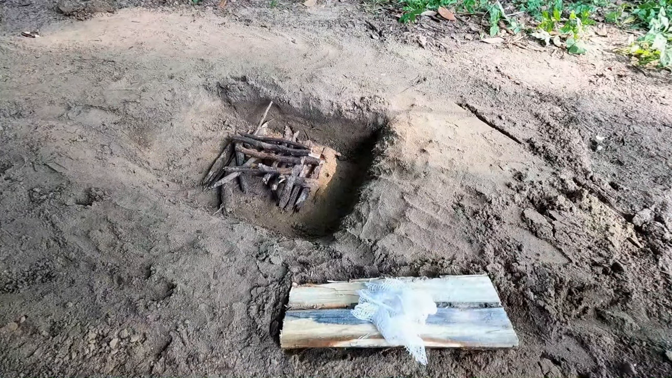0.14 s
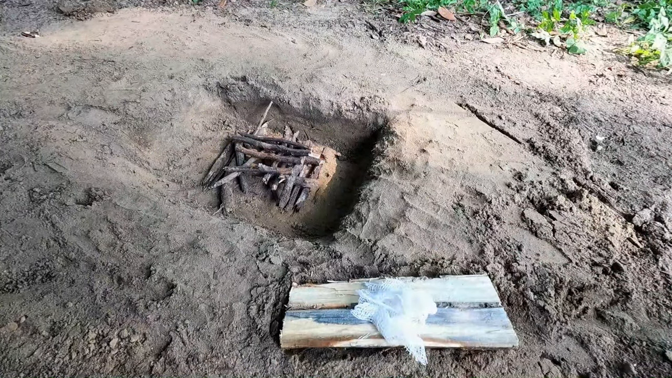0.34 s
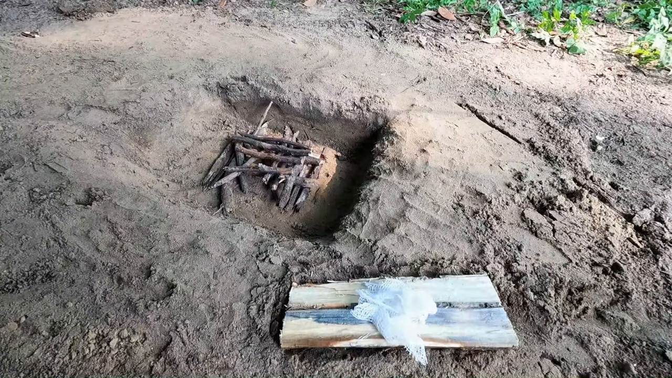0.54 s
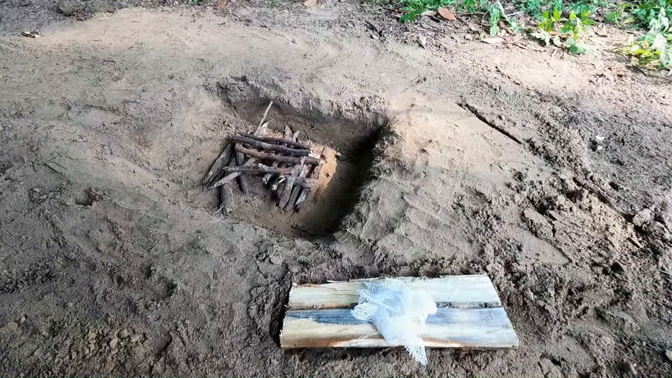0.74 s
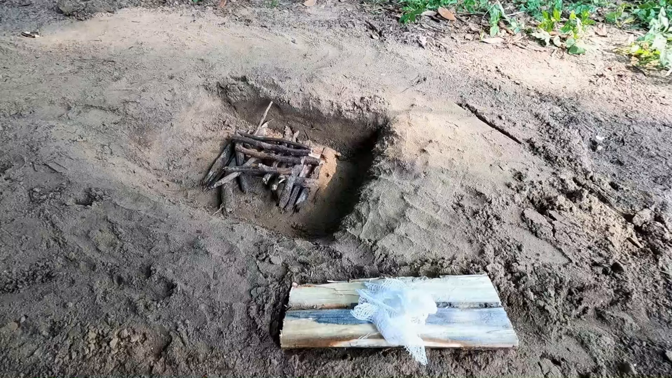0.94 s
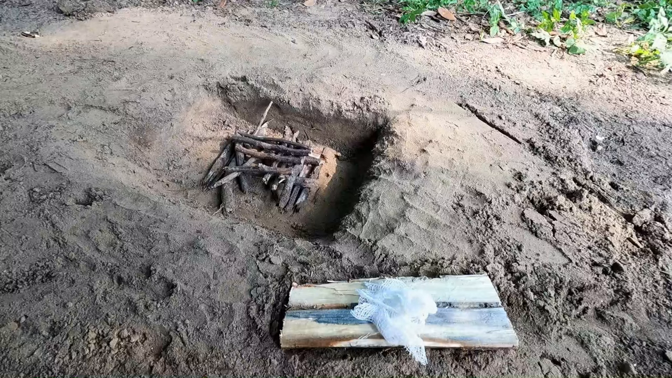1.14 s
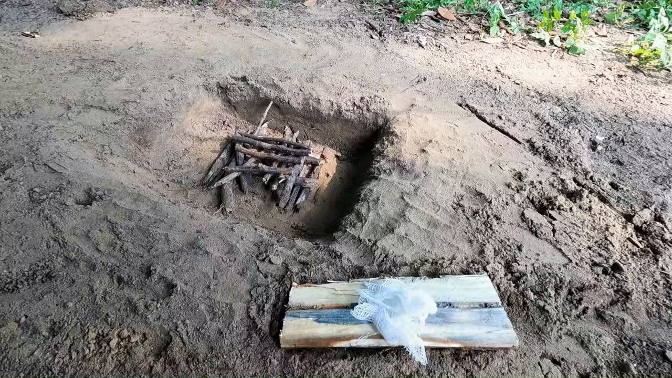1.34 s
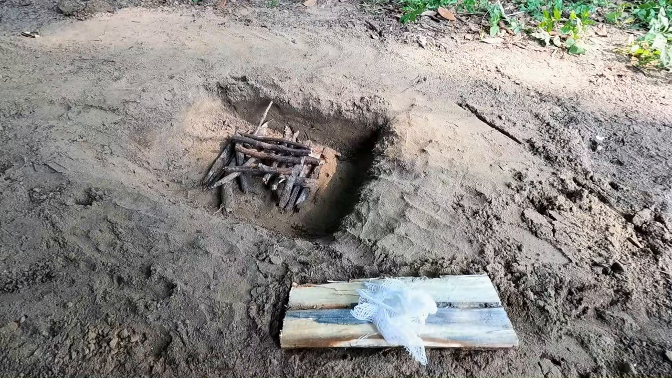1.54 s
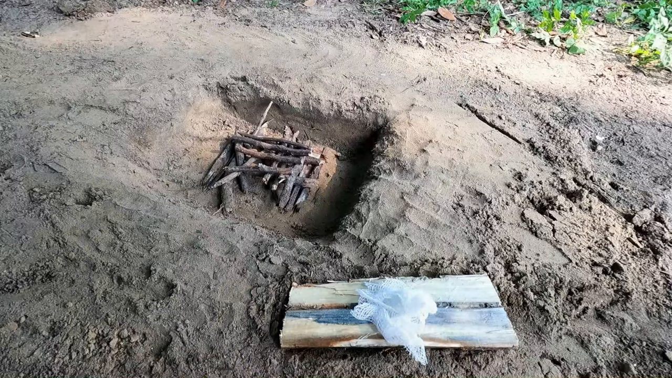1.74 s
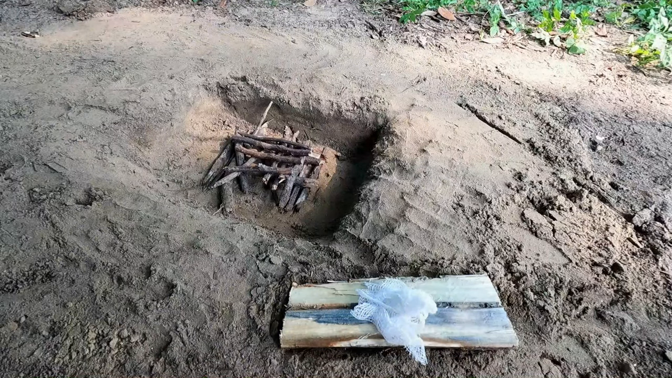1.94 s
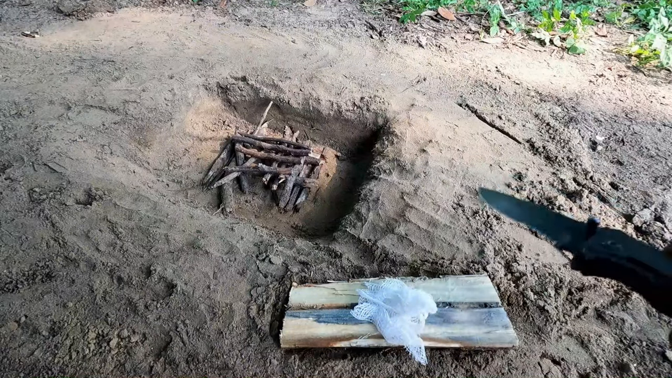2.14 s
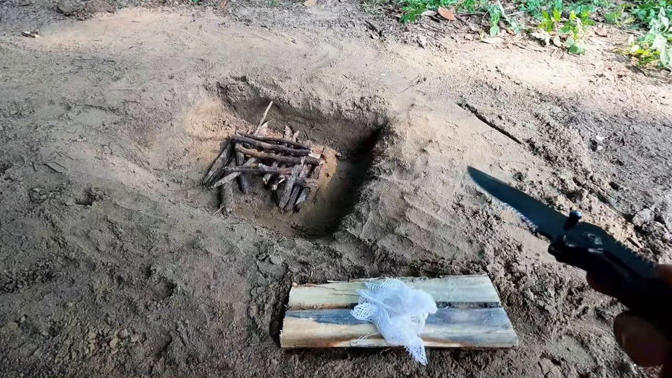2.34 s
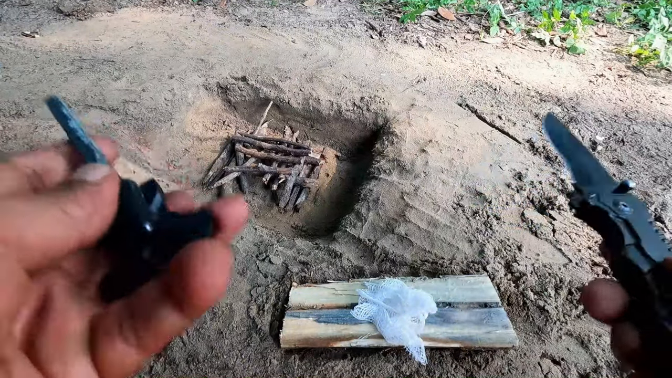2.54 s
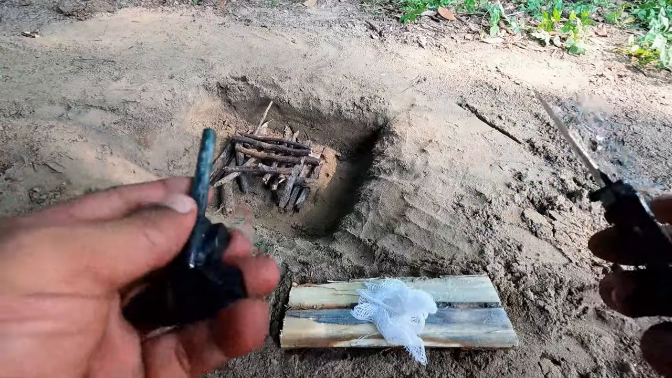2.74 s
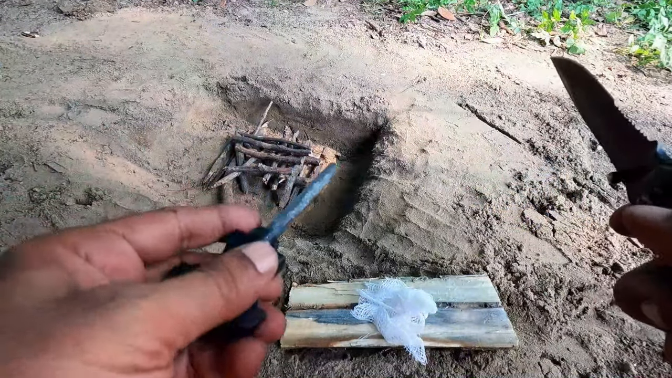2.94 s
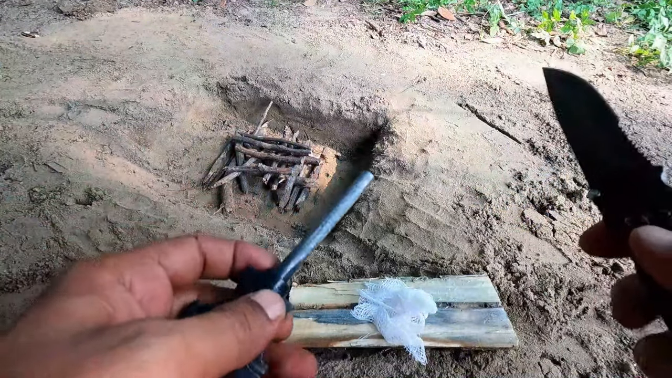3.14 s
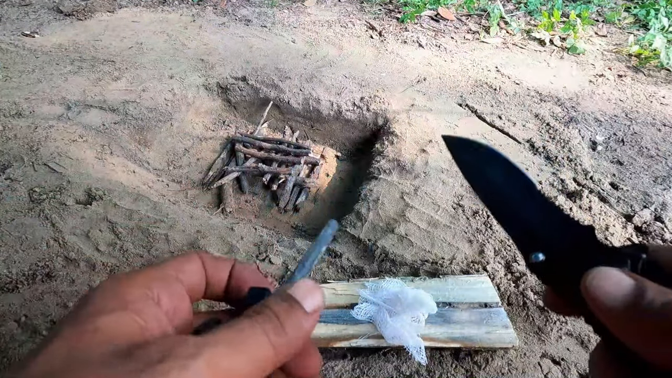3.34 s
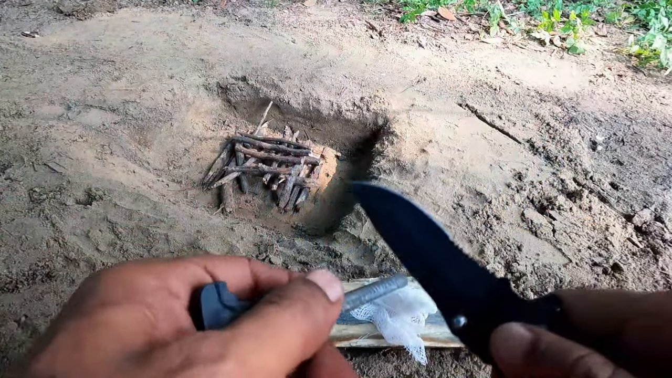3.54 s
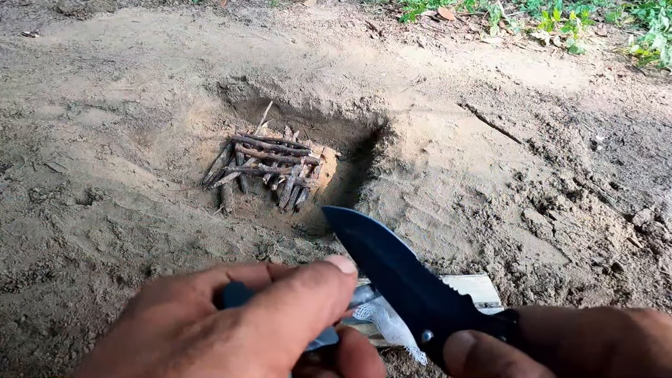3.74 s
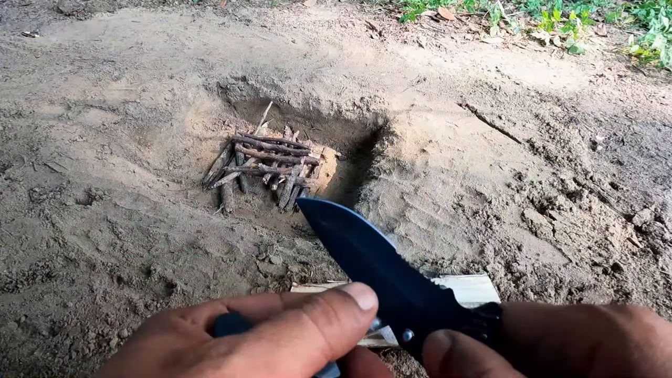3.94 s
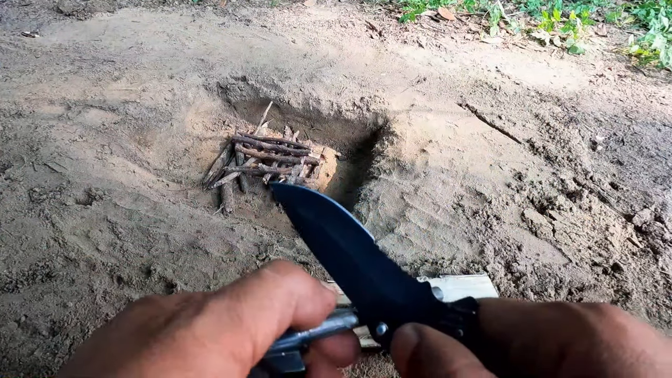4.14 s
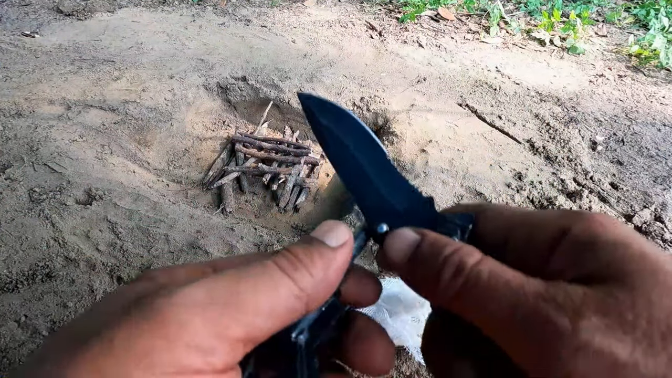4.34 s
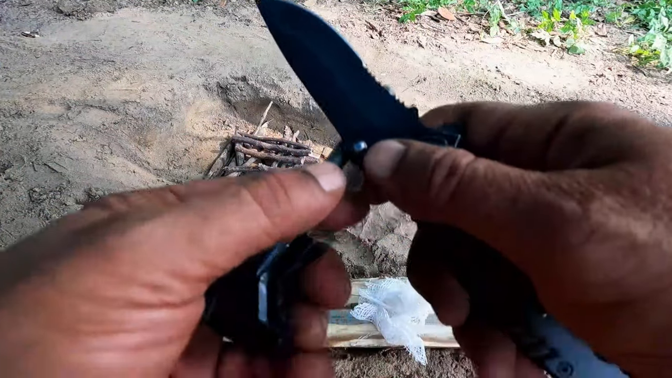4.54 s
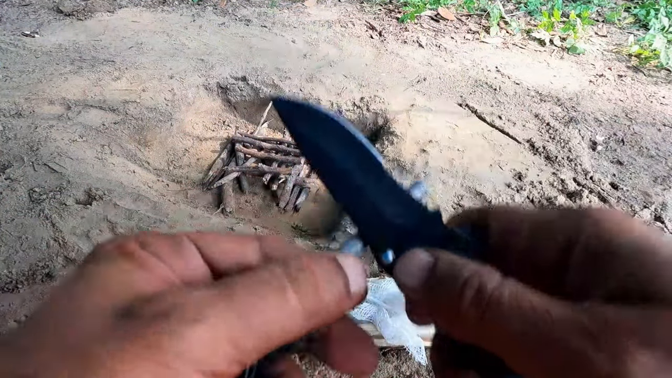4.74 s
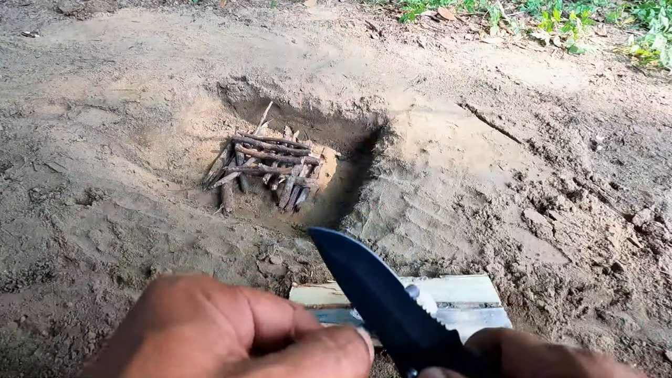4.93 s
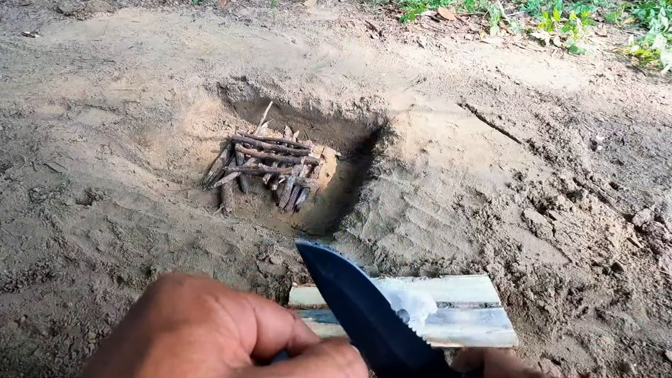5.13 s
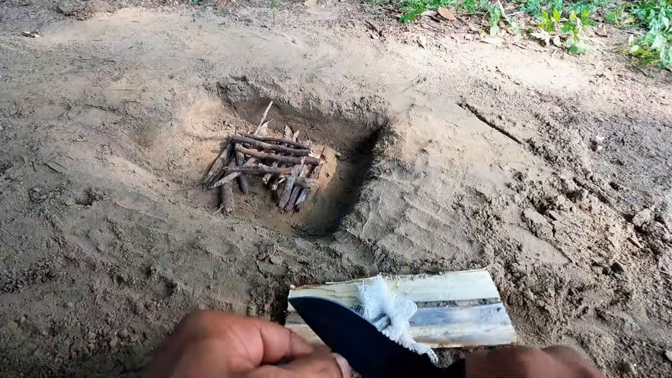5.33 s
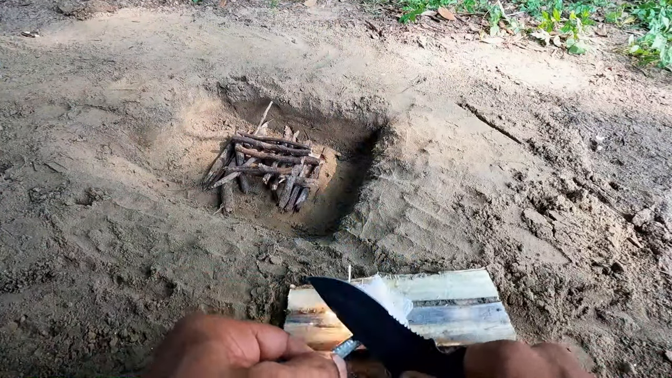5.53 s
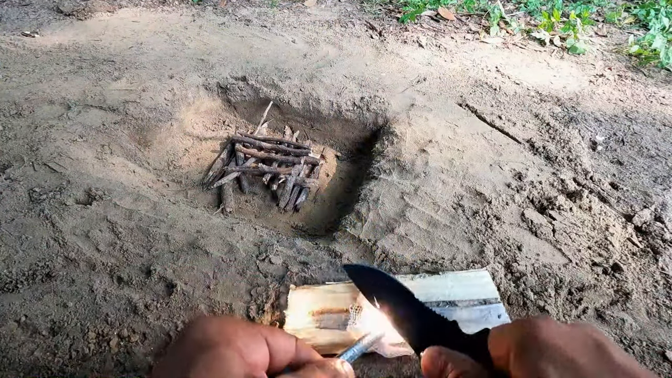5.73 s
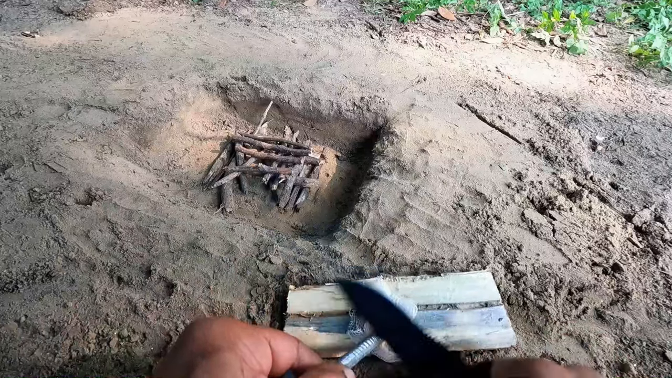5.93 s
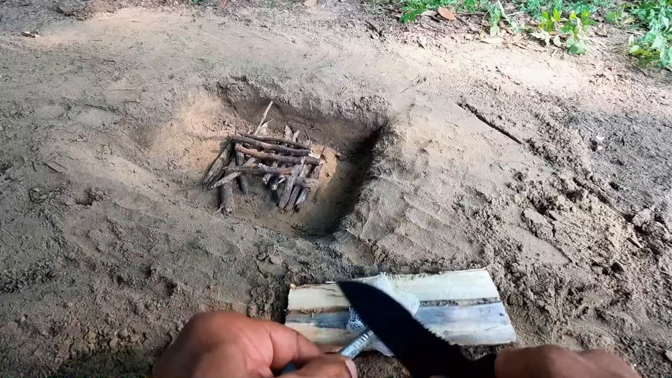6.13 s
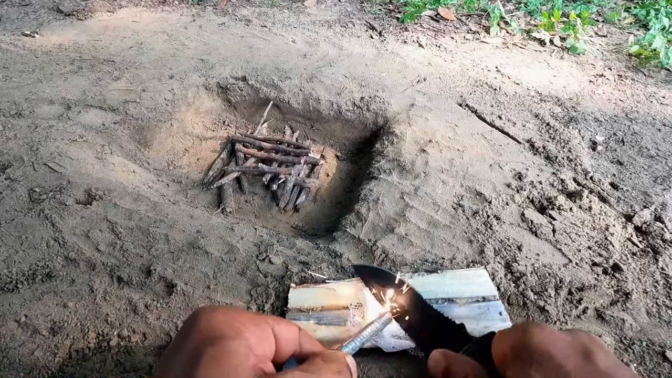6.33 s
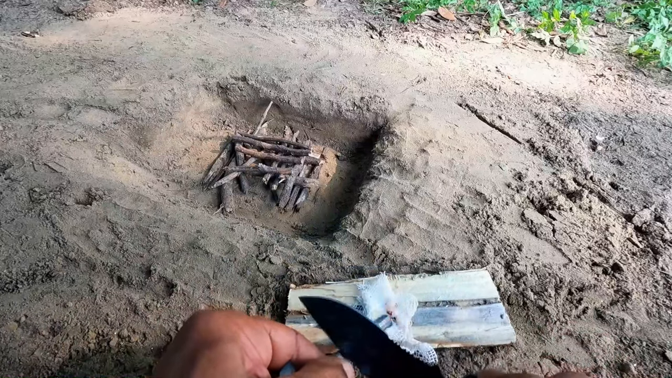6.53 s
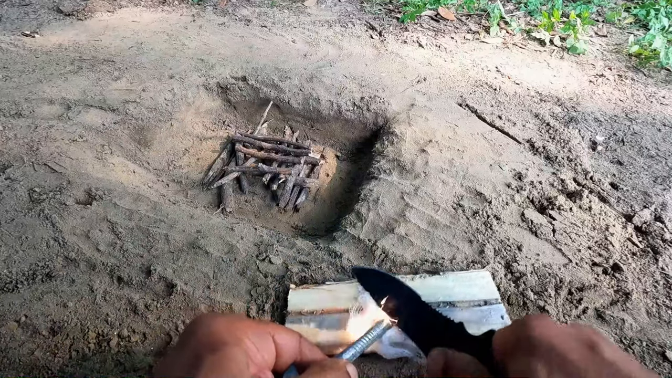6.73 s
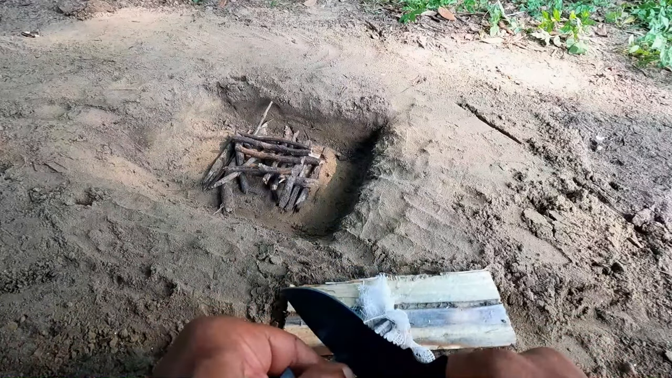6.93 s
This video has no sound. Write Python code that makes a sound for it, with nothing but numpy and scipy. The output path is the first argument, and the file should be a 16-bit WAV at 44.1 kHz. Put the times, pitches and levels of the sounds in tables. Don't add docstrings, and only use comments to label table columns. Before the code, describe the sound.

A distant engine wavers under rumble, thin air and a faint insect hiss, with birds chirping early among trees. A knife blade flicks and locks with a crisp double click. After a pause, its edge taps and scuffs a small metal rod, spaced and delicate. Then comes dense, aggressive back-and-forth scraping on wood, close and dry, with ringing bites, sharp clicks and low board knocks to the end.

```python
import sys
import numpy as np
from scipy import signal
from scipy.fft import rfft, irfft
from scipy.io import wavfile
from scipy.ndimage import uniform_filter1d

SR = 44100
rng = np.random.default_rng(int(sys.argv[2]) if len(sys.argv) > 2 else 0)


def invert_db(level):
    return 10 ** (np.asarray(level, dtype=float) / 20)


def pcm_store(signal):
    levels = np.round(np.clip(np.atleast_2d(signal), -1, 1) * 32767)
    wavfile.write(sys.argv[1], SR, levels.astype(np.int16).T)


N = 312228

# (centre [Hz], width [Hz], level [dB])
BOARD = [
    [(267, 173, 8.1), (946, 740, 5.7), (574, 610, 4.2)],
    [(2580, 960, 7.4), (3186, 620, 16.7), (3150, 520, 14), (4100, 790, 8.1), (5705, 350, 3.1)],
    [(7020, 950, 3), (9400, 4600, -11), (5720, 1570, 2)],
]
# (centre [Hz], width [Hz], level [dB])
ROD = [
    [(1482, 450, 2), (673, 230, -14.5)],
    [(3214, 1100, 6), (3665, 240, 11), (4050, 460, 8.5), (4940, 650, 1), (5660, 360, 6.5), (2240, 1800, -14.5)],
    [(6010, 770, 1), (7740, 3300, -7), (9960, 3600, -12.5)],
]
EDGE_STOP = 1.72


def evened(x):
    return x / np.sqrt(np.mean(x ** 2) + 1e-20)


def read(points, hz):
    f, value = np.transpose(points)
    return np.interp(np.log(hz + 1), np.log(f + 1), value)


def lay(maker, rows, *settings, **more):
    track = np.zeros(N)
    for row in rows:
        s, sound = maker(row, *settings, **more)
        part = track[round(s * SR):][:len(sound)]
        part += sound[:len(part)]
    return track


def arch(t, peak, rise, fall):
    return np.minimum(np.where(t < peak, (peak - t) / rise, (t - peak) / fall), 1)


def resonate(x, hz, width):
    turn = np.exp(2j * np.pi * np.cumsum(hz * np.ones(len(x))) / SR)
    r = np.exp(-np.pi * width / SR)
    return 2 * (turn * signal.lfilter([1 - r], [1, -r], x * turn.conj())).real


def body(x, modes, widen=0.77):
    total = 0
    for k, (hz, width, db) in enumerate(modes):
        once = resonate(x, hz, 1.72 * width * widen)
        total = total + (-1) ** k * invert_db(db) * resonate(once, hz, 1.54 * width * widen)
    return evened(total)


def stroke(row, feel, parts, catches_per_s, spread_db, contact_db, widen):
    peak, rise, fall, db, low_db = row
    fizz_db, start_hz, end_hz, stop = feel
    rise, fall = max(rise, .002), max(fall, .002)
    t = np.arange(-rise, fall + 0.017, 1 / SR)[:9000]
    n = len(t)
    ease_db = 25 * arch(t, 0, rise, fall) ** np.where(t < 0, 1.18, stop)
    ease_db = ease_db + 508 * np.maximum(t - fall, 0)

    noise = rng.standard_normal((6, n))
    hits, sizes = rng.random((2, n))
    clumps = [evened(uniform_filter1d(uniform_filter1d(c, 130), 130)) for c in noise[:3]]
    size_db = spread_db * np.minimum(-np.log(1 - sizes), 2.8)
    grains = (hits < catches_per_s / SR) * noise[3] * invert_db(size_db)
    slip = evened(grains) + 0.58 * noise[4]
    drives = slip, slip, slip + 0.36 * noise[5]
    low, middle, fizz = (body(drive * invert_db(3 * clump + clumps[1]), part, widen)
                         for drive, clump, part in zip(drives, clumps, parts))
    contact = body(slip, [(np.linspace(start_hz, end_hz, n), 650, 0)])
    middle = evened(middle + invert_db(contact_db) * contact)
    sound = middle + invert_db(low_db) * low + invert_db(fizz_db - 0.04 * ease_db) * fizz
    return peak - rise, invert_db(db - ease_db) * sound * signal.windows.tukey(n, min(1, 90 / n))


def click(row, parts, ring_db, t60):
    s, peak_db, hz, low_db, fizz_db = row
    t = np.arange(2600) / SR
    blow = rng.standard_normal(len(t)) * invert_db(-60 * t / t60)
    blow[10] = 4.3
    low, middle, fizz = (body(blow, part, widen=0.86) for part in parts)
    middle = middle + invert_db(ring_db) * body(blow, [(hz, 500, 0)])
    low, middle, fizz = (p / abs(p).max() for p in (low, middle, fizz))
    return s, invert_db(peak_db) * (middle + invert_db(low_db) * low + invert_db(fizz_db) * fizz)


def swell(row, width_hz, slide, drop_db, stop=2):
    peak, rise, fall, db, hz = row
    rise, fall = max(rise, .002), max(fall, .002)
    t = np.arange(-rise, fall, 1 / SR)
    noise, jolts = rng.standard_normal((2, len(t)))
    rough = noise * invert_db(2.4 * evened(uniform_filter1d(jolts, size=40)))
    glide = hz * np.linspace(1 - slide, 1 + slide, len(t))
    ring = body(rough, [(glide, width_hz, 0)])
    level = invert_db(db - drop_db * arch(t, 0, rise, fall) ** stop)
    return peak - rise, level * ring * signal.windows.tukey(len(t), .15)


def rasp(row, low_db, fizz_db, slide, stop):
    *shape, hz = row
    feel = fizz_db, hz * (1 - slide), hz * (1 + slide), stop
    return stroke((*shape, low_db), feel, BOARD, catches_per_s=2200, spread_db=4.2, contact_db=-0.5, widen=0.83)


def rasp_board():
    # (peak time [s], rise [s], fall [s], pressure [dB], contact resonance [Hz])
    pushes = [
        (5.644, 0.014, 0.033, -13, 3060),
        (5.715, 0.015, 0.067, -22.5, 3770),
        (5.769, 0.013, 0.035, -13.5, 3080),
        (5.803, 0.014, 0.01, -20, 2847),
        (6.104, .034, 0.035, -13.5, 2600),
        (6.43, .046, 0.05, -13, 3250),
        (6.745, 0.054, 0.016, -17, 3000),
        (6.885, 0.032, 0.04, -15.5, 3130),
    ]
    pulls = [
        (5.894, 0.019, 0.02, -16.5, 2940),
        (5.919, 0.02, 0.014, -18.5, 3150),
        (6.258, 0.06, 0.014, -29, 2874),
        (6.586, 0.047, 0.043, -28, 2700),
        (6.622, 0.025, 0.048, -20, 3350),
        (6.987, 0.017, 0.011, -15, 3220),
        (7.002, 0.0037, 0.025, -17, 2590),
        (7.036, 0.027, 0.035, -17, 2694),
    ]
    drags = [
        (5.69, 0.022, 0.024, -35.5, 2200),
        (5.855, 0.0091, 0.019, -30, 5000),
        (5.96, 0.039, 0.05, -39.5, 3630),
        (5.995, 0.0053, 0.049, -40, 2545),
        (6.131, 0.0031, 0.039, -31, 2400),
        (6.174, 0.0039, 0.048, -30.5, 4380),
        (6.472, 0.0059, 0.044, -24.5, 3060),
        (6.52, 0.03, 0.021, -46, 3140),
        (6.774, 0.011, 0.023, -31.5, 3905),
        (6.84, 0.05, 0.11, -29.5, 3400),
    ]
    # (time [s], peak [dB], strongest ring [Hz], low share [dB], fizz share [dB])
    knocks = [(5.6112, -20.5, 2510, -14, -33), (6.3315, -45, 2800, -30, -30), (6.3425, -37, 2696, -27, -30),
              (6.378, -33, 2713, -24, -27), (5.7035, -15, 3500, -6, -5), (5.7394, -8, 3690, -6, 0),
              (5.801, -8.5, 2330, 6, -14), (5.876, -4.5, 2710, -19, -9), (5.9865, -2.5, 2710, -20, -23),
              (6.0635, -21, 2500, -30, -25), (6.1261, -1, 2410, -1.5, -15), (6.1722, -23, 4300, -16, -11),
              (6.3523, -3.5, 2900, -14, -21), (6.3874, -17, 2510, -16, -29),
              (6.4662, 0.5, 2820, -0.5, -3.5), (6.549, -16, 5034, -13, -22), (6.5875, -1.5, 2937, -45, -23),
              (6.6168, -4.5, 2950, -26, -12), (6.6952, -19, 2780, -23, -28), (6.7719, -19, 3480, -8.5, -9),
              (6.8084, -22.5, 3870, -8, 1.5), (6.8686, -5.5, 2950, -54, -4), (6.9125, -1, 2886, -11, -3.5),
              (6.9987, -9, 2777, -7.5, -13), (7.0235, -1.5, 2730, -10.5, -29), (6.541, -31, 6030, -25, -6),
              (6.662, -11.5, 2700, -21, -21)]
    # (time [s], peak [dB], ring [Hz])
    chatter = [(5.6374, -6, 3100), (5.7173, -14, 3280), (5.7276, -8, 3850), (5.7654, 0, 2900),
               (5.779, -2, 3620), (6.1007, 0, 2260), (6.2585, -5, 2620), (6.4037, -4, 3310),
               (5.897, -9.5, 3460), (5.918, -21, 3880), (6.0822, -4, 4290), (6.0907, -1, 4100),
               (6.216, -21, 3195), (6.25, -15, 2610), (6.5628, -22, 2700), (6.578, -4.5, 2700),
               (6.628, -3, 2990), (6.6326, -16, 2710), (6.639, -14, 2910), (6.751, 2, 2470),
               (6.8313, -15, 4370), (6.8491, -6, 3100), (6.8775, 4, 3770), (6.8798, -8, 2896),
               (6.9884, -5, 2710), (7.0183, -2, 2683), (7.038, -9, 2970)]
    # (peak time [s], rise [s], fall [s], level [dB], centre [Hz])
    scuffs = [(5.65, 0.015, 0.019, -18, 6850), (5.722, 0.016, 0.028, -30, 4500),
              (5.79, .03, 0.022, -30, 6460), (5.856, 0.014, 0.02, -29.5, 5430),
              (5.914, 0.012, 0.011, -22, 4920), (6.1, 0.029, .02, -25.5, 7440),
              (6.18, 0.0088, 0.037, -34, 5070), (6.41, 0.02, 0.034, -27, 7560),
              (6.588, 0.0069, 0.0029, -21.5, 5660), (6.725, 0.02, 0.038, -26.5, 7640),
              (6.773, 0.0081, 0.0073, -31.5, 4990), (6.9, 0.037, 0.019, -27, 7140),
              (6.985, .012, 0.0074, -30, 6300), (7.045, 0.035, 0.036, -43, 7460)]
    strokes = lay(rasp, pushes, low_db=-7, fizz_db=-11, slide=0.63, stop=2.5)
    strokes += lay(rasp, pulls, low_db=-12.5, fizz_db=-11.5, slide=0.17, stop=2)
    strokes += lay(rasp, drags, low_db=-9.5, fizz_db=-6, slide=0.1, stop=1.5)
    catches = [(s, db - 8, hz, -18, -6) for s, db, hz in chatter]
    clicks = lay(click, knocks, BOARD, ring_db=6, t60=.012)
    clicks += lay(click, catches, BOARD, ring_db=0.1, t60=0.0064)
    hiss = lay(swell, scuffs, width_hz=3000, slide=0, drop_db=14, stop=EDGE_STOP)
    return strokes + clicks + hiss


def edge_bites():
    # (peak time [s], rise [s], fall [s], level [dB], mode [Hz])
    bites = [(3.97, 0.033, 0.068, -38.5, 3170), (4.94, .04, 0.064, -36, 4300),
             (5.231, 0.025, 0.021, -36, 2180), (5.643, 0.018, 0.022, -14.5, 3230),
             (5.651, 0.0094, 0.014, -15, 3800), (5.661, 0.012, 0.015, -18, 2460),
             (5.774, 0.018, 0.032, -32, 3020), (5.89, 0.015, 0.011, -36, 2870),
             (6.01, 0.02, 0.019, -37, 3280), (6.092, 0.017, 0.04, -16, 4060),
             (6.113, 0.014, 0.01, -10.5, 2240), (6.136, 0.0074, 0.0047, -27, 2390),
             (6.206, 0.021, 0.02, -41, 2750), (6.235, .025, .025, -31, 2900),
             (6.262, .018, .008, -24, 2700), (6.262, .008, .006, -29, 4100),
             (6.408, 0.015, 0.026, -20, 3730), (6.441, 0.027, 0.019, -15, 2390),
             (6.581, 0.024, 0.013, -21.5, 2750), (6.606, 0.013, 0.0097, -23.5, 4630),
             (6.635, .018, 0.0093, -13.5, 2830), (6.655, 0.014, 0.014, -20.5, 2830),
             (6.717, 0.013, 0.032, -26, 4000), (6.742, 0.025, 0.0097, -15.5, 3280),
             (6.745, 0.027, 0.021, -17.5, 2420), (6.878, 0.014, .025, -16.5, 2880),
             (6.89, 0.017, 0.034, -22, 3700), (6.985, .012, .01, -15.5, 2750),
             (7.002, 0.0055, 0.01, -25, 2800), (7.036, 0.018, 0.014, -12.5, 2830),
             (7.061, 0.0095, 0.0097, -20, 2627)]
    return lay(swell, bites, width_hz=490, slide=-0.023, drop_db=23, stop=EDGE_STOP)


def thump(row):
    s, peak_db, hz = row
    t = np.arange(1500) / SR
    turns = hz * (0.48 * t + 0.0037 * (1 - np.exp(-t / 0.0031)))
    return s, -invert_db(peak_db) * np.sin(2 * np.pi * turns) * np.exp(-(t / 0.0048) ** 2)


def landings():
    # (time [s], peak [dB], pitch [Hz])
    thumps = [
        (5.662, -15, 280),
        (5.801, -2, 204),
        (6.128, -5.5, 187.2),
        (6.469, -6.5, 211),
        (6.753, -13.5, 210.3),
        (6.913, -12, 253),
        (2.278, -22, 145),
        (5.342, -31.5, 534),
    ]
    return lay(thump, thumps)


def rub_rod():
    # (peak time [s], rise [s], fall [s], pressure [dB], low share [dB])
    rubs = [(3.868, 0.023, 0.063, -39.5, -7), (3.975, 0.084, 0.06, -27.5, -16.5),
            (4.09, 0.052, 0.041, -40, -22), (4.193, 0.042, 0.0018, -33.5, -7),
            (4.274, 0.042, 0.05, -50.5, -35), (4.39, 0.11, 0.18, -47.5, -33),
            (4.467, 0.021, 0.034, -24.5, -5), (4.53, 0.049, 0.032, -28, -6.5),
            (4.808, .014, 0.021, -30, -1), (4.918, 0.028, 0.099, -30, -2.5),
            (4.985, 0.035, 0.031, -32, -1.5), (5.232, 0.031, 0.021, -34.5, -13)]
    # (time [s], peak [dB], strongest ring [Hz], low share [dB], fizz share [dB])
    taps = [(3.8436, -4, 5520, -15, -14.5), (4.1937, -0.5, 3634, -10, -20), (4.466, -2.5, 4320, -19, -5),
            (4.5048, -17, 3400, -28, -9), (4.5406, -16.5, 4100, -20, -2.5), (4.6718, -34, 4210, -7.5, -7),
            (4.804, -18.5, 3778, -8, -8.5), (4.8539, -21.5, 3113, -5, -22), (5.3428, -35.5, 4530, 0, 3),
            (5.355, -25, 2800, -9, -31), (6.9498, -5.5, 4900, -12.5, -11)]
    # (centre [Hz], width [Hz], level [dB])
    struck_rod = [
        [(1575, 300, 4), (2250, 370, -1.5)],
        *ROD[1:],
    ]
    # (peak time [s], rise [s], fall [s], level [dB], pitch [Hz])
    rings = [
        (3.87, .02, .06, -44, 4250),
        (3.97, .05, .045, -40, 4200),
        (3.98, .06, .04, -43, 2000),
        (4.1, .035, .028, -46, 3900),
        (4.965, .06, .055, -36, 3200),
        (4.203, .006, .02, -40, 4950),
        (4.485, .015, .025, -34, 2950),
        (4.53, .03, .045, -40, 2020),
        (4.525, .03, .035, -38, 4400),
        (3.99, .05, .03, -42, 1500),
    ]
    squeaks = [
        (5.295, .026, .014, -50, 4200),
        (5.262, .015, .05, -54, 3450),
    ]
    squeal = (5.322, .022, .016, -45, 4750)
    feel = -11.5, 3300.5, 3101, 2
    sound = lay(stroke, rubs, feel, ROD, catches_per_s=9000, spread_db=1.8, contact_db=-8, widen=.55)
    sound += lay(click, taps, struck_rod, ring_db=-3, t60=.016)
    sound += lay(swell, rings, width_hz=170, slide=0, drop_db=12)
    sound += lay(swell, squeaks, width_hz=100, slide=.015, drop_db=8)
    return sound + lay(swell, [squeal], width_hz=90, slide=.09, drop_db=8)


def open_knife():
    # (peak time [s], rise [s], fall [s], pressure [dB], low share [dB])
    unfold = [
        (2.205, 0.025, 0.09, -37, -8.5),
        (2.211, 0.016, 0.015, -33, -29),
    ]
    # (time [s], peak [dB], strongest ring [Hz], low share [dB], fizz share [dB])
    latch = [
        (2.2077, -16.5, 3027, -44, 2),
        (2.2134, -10.5, 2850, -27, -2),
        (2.2208, -20, 5820, -17, 7),
        (2.2679, -10.5, 3060, -15.5, 8.5),
        (2.2768, 0, 3840, -32, -2),
    ]
    # (centre [Hz], width [Hz], level [dB])
    hinge = [
        [(1280, 260, 0)],
        [(3080, 930, 7), (5060, 2150, 3.5)],
        [(6670, 930, 9), (8580, 2100, 4), (9330, 1600, 0.5)],
    ]
    feel = 3.7, 3400, 2400, 2.1
    sweep = lay(stroke, unfold, feel, hinge, catches_per_s=3000, spread_db=3, contact_db=-6, widen=.9)
    return sweep + lay(click, latch, hinge, ring_db=-3, t60=.012)


def handling():
    # (time [s], peak [dB], ring [Hz])
    ticks = [(0.613, -47, 4800), (0.697, -47, 5700), (1.7215, -42.5, 5380), (2.008, -44.5, 3110),
             (2.093, -40, 5600), (2.563, -40, 7090), (2.668, -36, 5874), (2.696, -38, 5390),
             (2.874, -44, 4390), (3, -47, 5730), (3.219, -44, 4734), (3.5075, -40, 5300)]
    # (peak time [s], rise [s], fall [s], level [dB], centre [Hz])
    rustles = [
        (.615, .012, .018, -57, 6000),
        (.705, .015, .03, -61, 5500),
        (3.0, .04, .05, -61, 7000),
        (3.23, .03, .05, -60, 6000),
    ]
    tick_rows = [(s, db, hz, -16, -6) for s, db, hz in ticks]
    sound = lay(click, tick_rows, ROD, ring_db=4.1, t60=0.09)
    return sound + lay(swell, rustles, width_hz=6000, slide=0, drop_db=10)


def ports(x):
    # (frequency [Hz], level [dB])
    port_phase = [(500, 0), (1000, -.3), (1400, -.1), (3800, -.7), (5500, -.25), (8000, -.1), (11000, -.15),
                  (13000, -1.5)]
    port_db = [(200, 0), (700, -2.5), (1400, -3), (2800, -1.3), (6000, -1.1), (10000, -.3)]
    t, hz = np.arange(900) / SR, np.fft.rfftfreq(N, 1 / SR)
    near = rng.standard_normal((2, len(t))) * invert_db(-60 * t / .02) * (t > .0006)
    near = invert_db(-13) * near / np.linalg.norm(near[0])
    half = invert_db(read(port_db, hz) / 2) * np.exp(.5j * read(port_phase, hz))
    direct = irfft(rfft(x) * np.array([half, 1 / half]), N)
    moving = evened(uniform_filter1d(rng.standard_normal((2, N)), size=900))
    return direct + signal.oaconvolve(x * moving, near, axes=1)[:, :N]


def engine():
    # (peak time [s], rise [s], fall [s], level [dB], pitch [Hz])
    throbs = [(.17, 0.098, 0.099, -17, 56.15), (.42, 0.077, 0.17, -19, 58.07), (.62, 0.1, 0.45, -25, 57.4),
              (.97, 0.11, 0.25, -16, 57.75), (1.265, 0.045, 0.12, -25, 60.63),
              (1.48, 0.056, 0.11, -14.5, 60.1), (1.628, 0.082, 0.078, -14.5, 59.2),
              (1.84, 0.065, 0.054, -20, 59.53), (1.952, 0.096, 0.076, -18.5, 59.4),
              (2.089, 0.072, 0.053, -16.5, 59.7), (2.195, 0.063, 0.079, -17, 60.16),
              (2.5, 0.2, 0.27, -21, 58.17), (3.072, 0.25, 0.17, -15.5, 56.65),
              (3.43, 0.26, 0.15, -25, 56.68), (3.67, 0.29, 0.091, -20, 56.66),
              (4.04, 0.23, 0.12, -19, 57.13), (4.5, 0.27, 0.28, -21, 57.37),
              (5.11, 0.23, 0.17, -17.5, 56.13), (5.3, 0.065, 0.051, -26.5, 57.8),
              (5.433, 0.072, 0.14, -18, 54.5), (5.6, 0.076, 0.12, -18, 49.9), (6.0, 0.84, 0.17, -29, 50.65),
              (6.6, 1, 0.66, -28.5, 50.42)]
    t, (peaks, *_, hz) = np.arange(N) / SR, np.transpose(throbs)
    slow = t[::64]
    level = 0
    for *shape, db, _ in throbs:
        level = level + invert_db(db) * abs(np.cos(np.pi / 2 * arch(slow, *shape))) ** 1.48
    idle = invert_db(-42.5)
    turns = np.cumsum(np.interp(t, peaks, hz)) / SR
    return np.sqrt(2) * (idle + np.interp(t, slow, level)) * np.sin(2 * np.pi * turns)


def chirp(row):
    s, length, db, first_hz, last_hz = row
    attack, fuzz = 0.13, 0.55
    t = np.arange(0, length, 1 / SR)
    hz = np.linspace(first_hz, last_hz, len(t))
    clean = np.sqrt(2) * np.sin(2 * np.pi * np.cumsum(hz) / SR)
    blur = body(rng.standard_normal(len(t)), [(hz, 120, 0)])
    level = invert_db(db - 11 * arch(t / length, attack, attack, 1 - attack) ** 2)
    return s, level * ((1 - fuzz) * clean + fuzz * blur) * signal.windows.tukey(len(t), .1)


def trees():
    # (start time [s], length [s], level [dB], first pitch [Hz], last pitch [Hz])
    chirps = [(0.019, 0.021, -43, 2240, 2600), (0.037, 0.11, -41.5, 2665, 2250),
              (0.189, 0.049, -47, 2447, 2800), (0.206, 0.12, -52, 2840, 2680),
              (1.097, 0.14, -50, 3416, 3070), (1.24, 0.079, -54.5, 3150, 2950),
              (1.33, 0.069, -51, 3270, 3140), (1.298, 0.13, -49.5, 2676, 2580),
              (1.391, 0.087, -49, 2760, 2660), (0.059, 0.028, -49, 3730, 3970),
              (0.153, 0.038, -52.5, 3670, 3790), (1.318, 0.29, -55.5, 1272, 1516)]
    # (peak time [s], rise [s], fall [s], level [dB], centre [Hz])
    far_calls = [
        (2.47, .06, .12, -63, 3180),
        (2.55, .08, .09, -60, 3800),
        (2.65, .1, .1, -61, 5700),
        (3.22, .03, .04, -61, 3000),
        (3.36, .15, .15, -64, 4750),
        (3.58, .05, .09, -60, 2450),
        (5.45, .04, .13, -57, 2780),
        (1.47, .09, .22, -56, 2320),
    ]
    leaves = [
        (1.48, 0.18, 0.39, -53, 1610),
        (1.13, .12, 0.085, -59, 1400),
    ]
    sound = lay(chirp, chirps)
    sound += lay(swell, far_calls, width_hz=320, slide=-.015, drop_db=11)
    return sound + lay(swell, leaves, width_hz=540, slide=-.05, drop_db=15)


def woods(x):
    t = np.arange(12000) / SR
    tail = rng.standard_normal((2, len(t))) * invert_db(-60 * t / 0.36)
    tail = tail / np.linalg.norm(tail[0])
    return invert_db(0.5) * x + invert_db(1.5) * signal.oaconvolve(x[None], tail, axes=1)[:, :N]


def wash(colour, patchy_db, size):
    # (frequency [Hz], left-right likeness [0-1])
    likeness = [(60, 0.99), (180, .97), (550, 0.6), (1650, 0.26), (4970, 0.59), (15000, 0.66)]
    frames, hz = 4 * N // size + 5, np.fft.rfftfreq(size, 1 / SR)
    a, b, c, d, patches = rng.standard_normal((frames, len(hz), 5)).T
    patches = evened(uniform_filter1d(uniform_filter1d(patches, size // 60, 0), 20000 // size, 1))
    same = np.clip(read(likeness, hz), -1, 1)[:, None]
    left = a + 1j * b
    right = same * left + np.sqrt(1 - same ** 2) * (c + 1j * d)
    z = np.array([left, right]) * invert_db(read(colour, hz)[:, None] + patchy_db * patches)
    return evened(signal.istft(z, nperseg=size, noverlap=size * 3 // 4)[1][:, :N])


def background():
    # (time [s], level [dB])
    ambience = [(0, 9.5), (1.2, 5.5), (2.28, 9.5), (2.301, -4.5), (2.6, 2), (3.6, 6), (5.33, 5.5),
                (5.35, 6.5), (5.75, 1), (6.3, -5.5), (7.08, 3.5)]
    # (centre [Hz], width [Hz], level [dB])
    engine_orders = [(91.3, 4.8, -45), (141.2, 0.74, -41.5), (192.9, 2.26, -48), (225.9, 7.3, -52),
                     (285.25, 6.1, -49.5)]
    insect = (8650, 160, 0)
    # (frequency [Hz], density [dB per Hz])
    rumble_colour = [(12, -11), (20, -5), (48, -8), (75, 13.5), (89, -6.5), (108, -3), (289, -19.5),
                     (332, -23.5), (418, -24), (466, -30.5), (800, -43), (1040, -119), (1760, -120)]
    air_colour = [(300, -13), (500, -12.5), (845, -14.5), (1030, -6), (1280, -4), (2290, -13.5),
                  (3430, -17.5), (4800, -12.5), (5500, -7), (6730, -16.5), (8570, -16), (9200, -22),
                  (12000, -31), (13600, -49), (15000, -84)]
    level_db = np.interp(np.arange(N) / SR, *np.transpose(ambience))
    rumble_level = invert_db(-36 + level_db)
    air_level = invert_db(-56.5 + 0.42 * level_db)
    orders = 0
    for hz, width, db in engine_orders:
        orders = orders + invert_db(db) * body(rng.standard_normal(N), [(hz, width, 0)])
    low = invert_db(4) * wash(rumble_colour, 2.23, size=2048) + invert_db(32) * orders
    insects = body(rng.standard_normal(N), [insect])
    hiss = invert_db(1.5) * wash(air_colour, 2.2, size=512) + invert_db(-14) * insects
    return rumble_level * low + air_level * hiss


def scene():
    knife = rasp_board() + edge_bites() + rub_rod() + open_knife() + handling()
    return ports(knife) + landings() + engine() + woods(trees()) + background()


def low_pass(x):
    return signal.sosfilt(signal.butter(12, 15700, fs=SR, output="sos"), x)


def record(dry):
    knee, room = .6, .34
    bent = np.sign(dry) * (knee + room * np.tanh((abs(dry) - knee) / room))
    clipped = np.where(abs(dry) < knee, dry, bent)
    lowpass = signal.firwin(101, 14700, window="blackman", fs=SR)
    limited = signal.oaconvolve(clipped, lowpass[None], "same")
    return low_pass(limited)


dry = scene()
out = record(dry)
pcm_store(out)
```